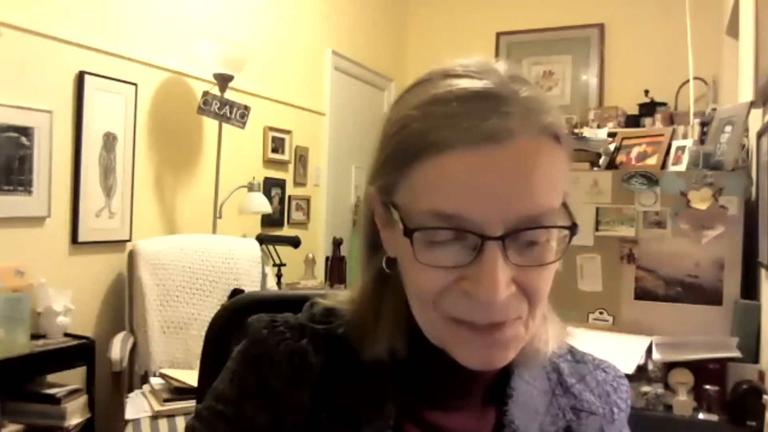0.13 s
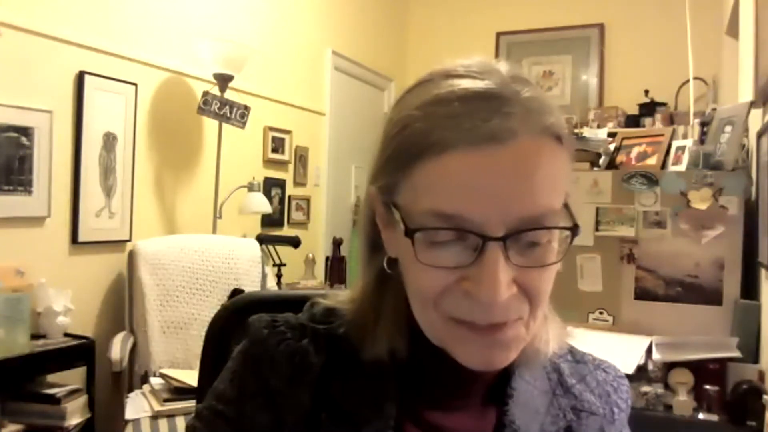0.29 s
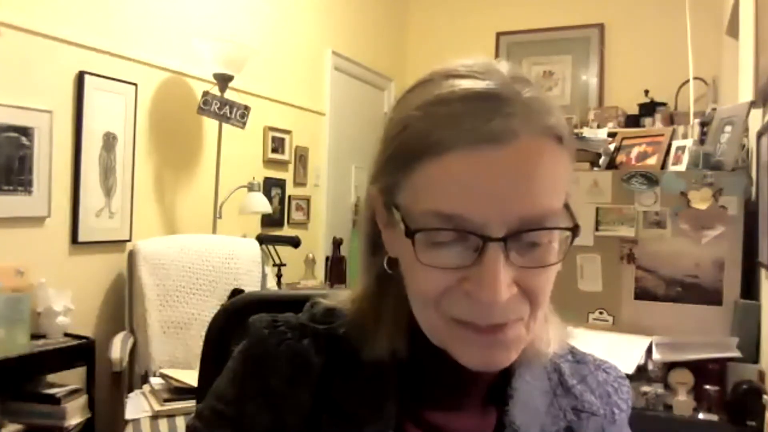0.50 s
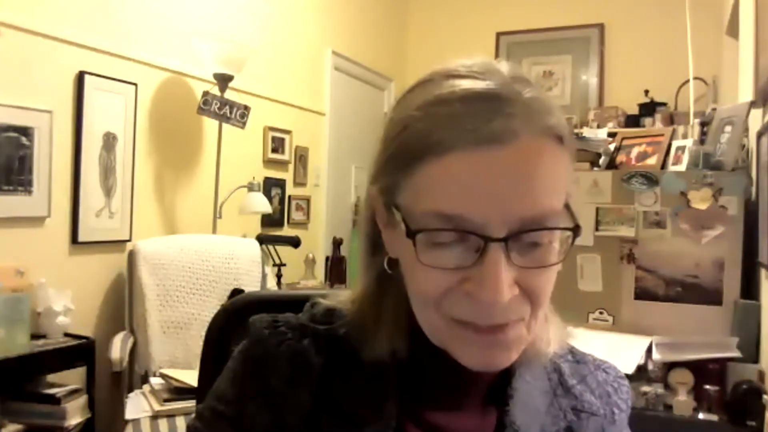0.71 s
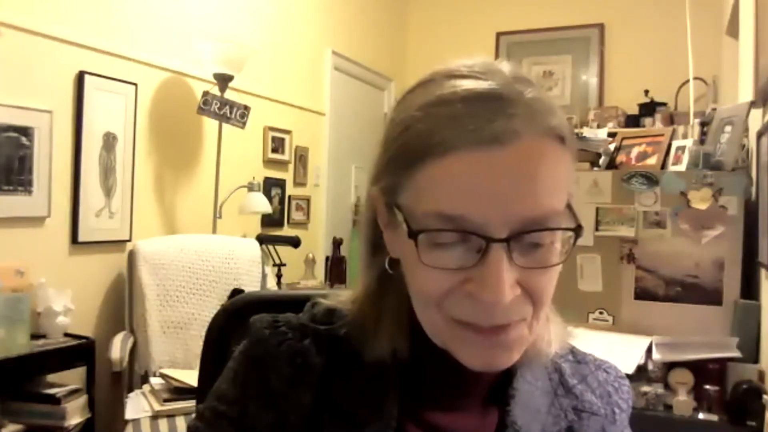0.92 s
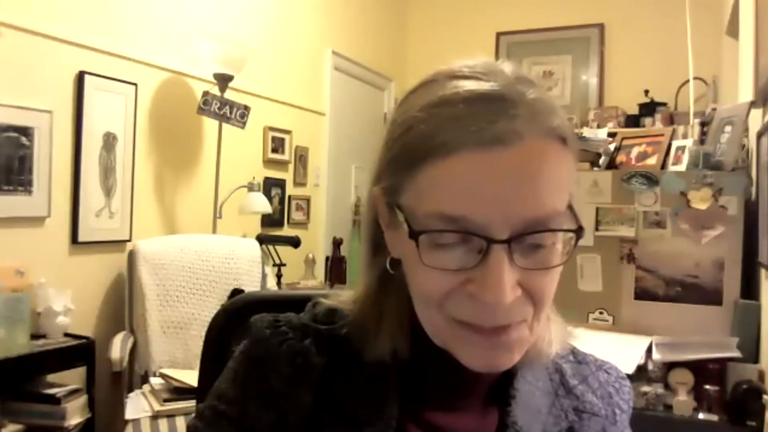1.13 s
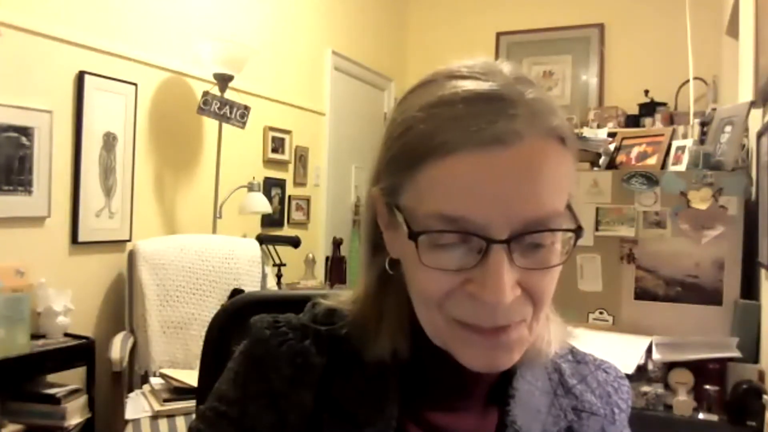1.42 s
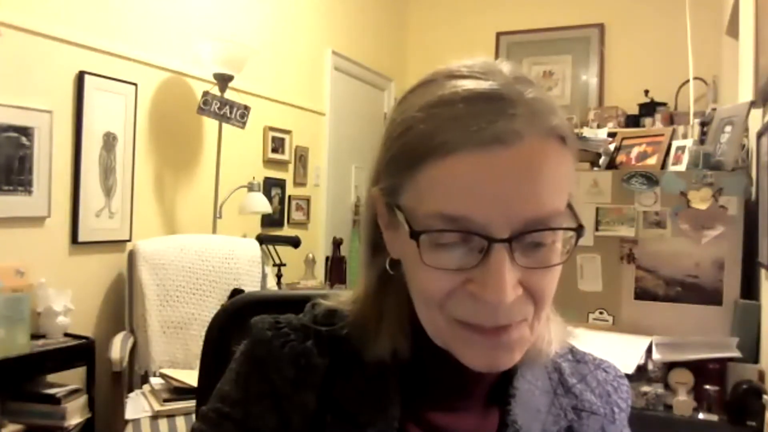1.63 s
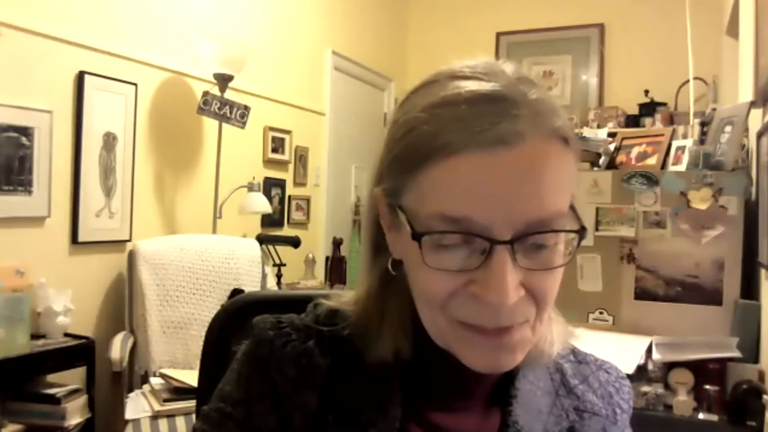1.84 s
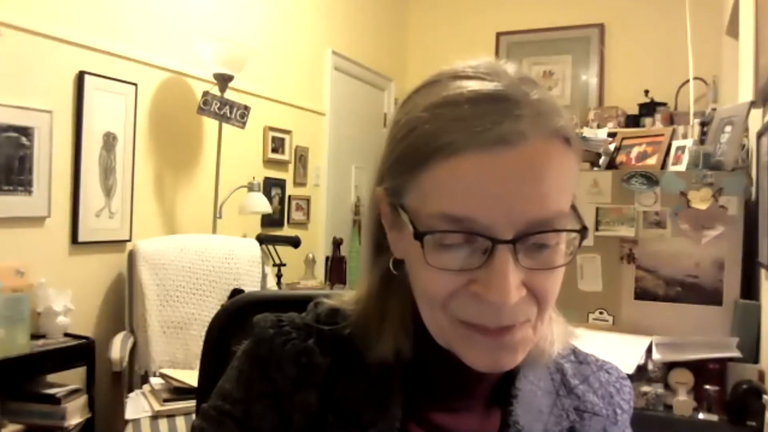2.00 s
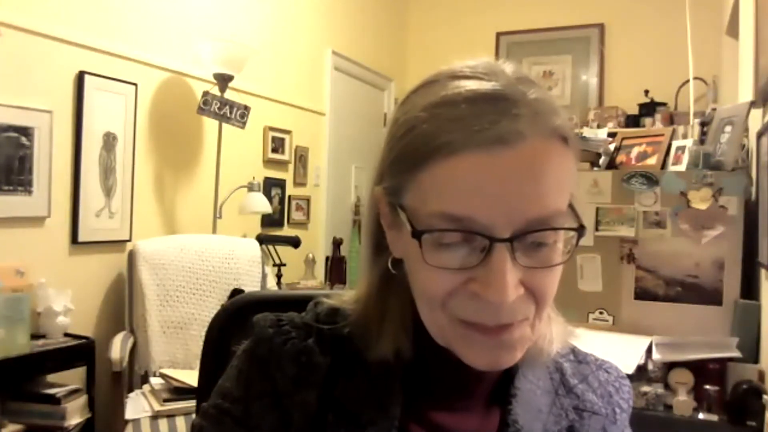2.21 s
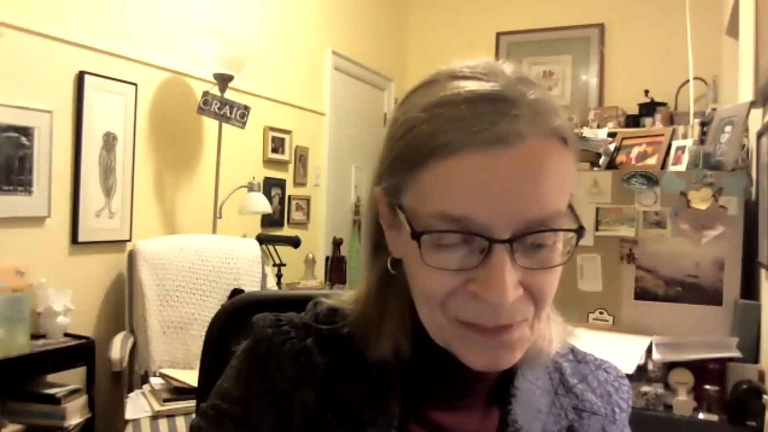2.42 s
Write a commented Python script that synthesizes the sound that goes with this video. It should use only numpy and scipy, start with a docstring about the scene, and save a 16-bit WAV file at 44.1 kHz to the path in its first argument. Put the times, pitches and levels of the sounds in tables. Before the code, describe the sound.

Close keyboard typing for about 2.4 seconds. A faint key release starts it, then quick plastic clacks from 0.24 to 0.53, the loudest sharp hit at 0.7, more at 0.9 to 1.23, double hits near 1.48 and 1.73, a fast cluster from 1.92 to 2.03, and a last press at 2.28. Small rattles, ticks and soft desk thuds fall between. Short room tail, faint rapid low throb, hum, hiss and thin whines.

```python
"""Quick typing in a quiet room

A plastic keyboard is heard close to a small computer microphone. Gritty noise through resonances makes
the sharp clack of each key hitting bottom, its loose rattle back up and small ticks; the case rings briefly.
Soft decaying tones are the desk's thuds. A machine throbs about 24 times a second as repeating pulses
with two hum tones, and shaped noise makes a faint hiss with two thin whines."""
import sys
import numpy as np
from scipy import signal
from scipy.fft import rfft, irfft, next_fast_len
from scipy.io import wavfile
from scipy.ndimage import uniform_filter1d, map_coordinates

SR = 44100
rng = np.random.default_rng(int(sys.argv[2]) if len(sys.argv) > 2 else 0)


def invert_db(level):
    """Linear amplitude ratio for a level in decibels (20 dB per decade), elementwise."""
    return 10 ** (np.asarray(level, dtype=float) / 20)


def transcribe(signal):
    """Save signal, clipped to [-1, 1], as a 16-bit WAV file at the path in sys.argv[1]."""
    frames = np.atleast_2d(signal).T
    limited = np.clip(frames, -1, 1)
    pcm = np.round(limited * 32767).astype(np.int16)
    wavfile.write(sys.argv[1], SR, pcm)


N = 112455  # length of the scene in samples
LEAD = SR // 25  # samples kept free ahead of each key sound's zero time
KEY_TIME = (np.arange(SR // 6) - LEAD) / SR  # seconds around one key event
THROB_HZ = 24.11


def unit(x):
    """Scaled to rms 1."""
    return x / np.sqrt(np.mean(x ** 2) + 1e-20)


def along(points, hz):
    """Reads between (Hz, value) points on a log frequency axis."""
    f, v = np.transpose(points)
    return np.interp(np.log(hz + 1), np.log(f + 1), v)


def wobble(rate):
    """A smooth random curve with rate knots a second."""
    knots = rng.standard_normal(int(N * rate / SR) + 4)
    return map_coordinates(knots, [np.arange(N) * rate / SR])


def filtered(x, response):
    """Multiplies the spectrum of x by a response of frequency."""
    m = next_fast_len(len(x) + 8192)
    return irfft(rfft(x, m) * response(np.fft.rfftfreq(m, 1 / SR)), m)[:len(x)]


def high_pass(f, hz, power):
    """Gain that falls below hz, more steeply with a higher power."""
    return 1 / (1 + (hz / (f + 1)) ** power)


def low_pass(f, hz, power):
    """Gain that falls above hz, more steeply with a higher power."""
    return 1 / (1 + (f / hz) ** power)


def resonance(f, hz, width_hz):
    """One causal resonance, gain 1 at its centre."""
    return 1j * f * width_hz / (hz * hz - f * f + 1j * f * width_hz)


def fade(t, t60):
    """Exponential decay from time 0, falling 60 dB in t60 seconds."""
    return (t >= 0) * invert_db(-60 * np.maximum(t, 0) / t60)


def once_a_cycle(s, width):
    """A bell-shaped pulse at delay s in every throb cycle, both in seconds."""
    cycles = ((np.arange(N) / SR - s) * THROB_HZ + .5) % 1 - .5
    return np.exp(-.5 * cycles ** 2 / (width * THROB_HZ) ** 2)


def keys():
    """Lays out every press, return and tick, each with its own room tail."""
    out = np.zeros(N + 2 * SR)
    for s, db, sound in presses() + returns() + ticks():
        wet = room(sound)
        out[round(s * SR) + LEAD:][:len(wet)] += invert_db(db) * wet
    return filtered(out[2 * LEAD:2 * LEAD + N], lambda f: high_pass(f, 448, 8))


# Keys hitting bottom. Each row: start in seconds, level in dB, key cap resonance in Hz,
# case knock trim in dB, treble trim in dB.
KEY_PRESSES = [(0.241, -13.5, 2150, -16, -11), (0.361, -11, 4400, -18.5, -13), (0.448, -20, 1670, -4, -12),
               (0.531, -13, 5100, -11, -12.5), (0.703, -3, 2940, -26.5, -11.5), (0.713, -19, 2360, -6, -11),
               (0.901, -11, 2790, -13, -11), (1.011, -27, 1910, -8, -12.5),
               (1.076, -14.5, 1700, -8.5, -13.5), (1.101, -33, 1970, 6.5, -11),
               (1.182, -21.5, 1870, -9.5, -12.5), (1.229, -14, 2010, -9.5, -3),
               (1.478, -14, 2060, -10.5, -4.5), (1.49, -17.5, 2090, -9, -3.5), (1.498, -24, 2000, -11, -5),
               (1.726, -11, 3690, -16.5, -12), (1.736, -24.5, 2300, -3, -11),
               (1.921, -13.5, 4320, -30, -12.5), (1.936, -18.5, 1530, -20, -17),
               (1.982, -17, 2700, -8.5, -2.5), (2.028, -16, 2130, -6, -16),
               (2.284, -14.5, 1930, -6.5, -3.5), (2.294, -36, 1930, 0, -22)]


def presses():
    """The stem scrapes, the key hits bottom with a clack, then a weaker sound settles."""
    slide_s, slide_db, rise_s, hold_s = 0.0062, -13, 0.0007, 0.0038
    clack_t60_s, settle_db, settle_t60_s = 0.023, -16, 0.13
    t = KEY_TIME
    scrape = invert_db(slide_db) * np.clip(1.08 + t / slide_s, 0, 1) * (t > -slide_s) * (t < 0)
    clack = fade(np.maximum(t - hold_s, 0), clack_t60_s)
    settle = invert_db(settle_db) * fade(t, settle_t60_s)
    shape = scrape + np.clip(t / rise_s, 0, 1) * (clack + settle)
    return [(s, db, contact(shape, hz, knock_db, treble_db, grit_db=3.5, loose=0.47))
            for s, db, hz, knock_db, treble_db in KEY_PRESSES]


# Keys springing back and rattling. Each row: start in seconds, level in dB, swell time in seconds,
# case knock trim in dB, treble trim in dB.
KEY_RETURNS = [(-.012, -16.5, 0.0045, -9.5, -6.5), (0.108, -27, 0.013, -5.5, -1),
               (0.316, -22.5, 0.004, -7.5, -10), (.659, -25, .01, -8, -0.5), (.813, -34, 0.0036, -13, -8.5),
               (1.329, -24, 0.011, -6.5, -2.5), (1.553, -23, 0.0073, -6, -2), (1.808, -40, .01, -16, -14),
               (2.077, -30.5, 0.0068, -38, -6), (2.406, -24, 0.0079, -5, -0.5)]


def returns():
    """A released key springs back: its rattle swells, then dies away."""
    start_db, t60_s = -8.5, 0.095
    t = KEY_TIME
    sounds = []
    for s, db, swell, knock_db, treble_db in KEY_RETURNS:
        rise = invert_db(start_db * np.clip(1 - t / swell, 0, 1)) * (t > 0)
        rattle = rise * fade(np.maximum(t - swell, 0), t60_s)
        sounds.append((s, db, contact(rattle, 2060, knock_db, treble_db, grit_db=0.0, loose=7.9)))
    return sounds


# Small ticks of stems and springs. Each row: start in seconds, level in dB, resonance in Hz.
STEM_TICKS = [(0.0914, -26.5, 1280), (0.2352, -19.5, 2290), (0.3118, -31, 2800), (0.4382, -31, 1640),
              (0.4659, -26.5, 2620), (0.4764, -29.5, 2760), (0.5629, -30.5, 1140), (0.6454, -25, 1648),
              (0.8021, -29.5, 1330), (0.97, -33, 1250), (0.9919, -26, 2600), (1.1626, -29, 1710),
              (1.202, -43, 2100), (1.2762, -30.5, 1100), (1.3138, -30, 2400), (1.5419, -23, 1680),
              (1.8017, -30.5, 1662), (1.951, -28, 1270), (2.0166, -24, 2260), (2.0465, -34, 2230),
              (2.0662, -27.5, 2210), (2.319, -27, 1142), (2.393, -25.5, 1390)]


def ticks():
    """Stems and springs tick: a very short burst of dull noise with a longer tail."""
    rise_s, t60_s, tail_db, tail_t60_s = 0.0011, 0.0071, -2, 0.072
    t = KEY_TIME
    shape = np.clip(t / rise_s, 0, 1) * (fade(t, t60_s) + invert_db(tail_db) * fade(t, tail_t60_s))
    return [(s, db, contact(shape, hz, knock_db=-22, treble_db=-24, grit_db=2, loose=1))
            for s, db, hz in STEM_TICKS]


# Ringing tones of the case. Each row: central pitch in Hz, central level in dB,
# time to fall 60 dB in seconds.
CASE_MODES = [(547, -8.5, 0.12), (689, -3, 0.079), (799, 7.5, 0.024), (880, 6.5, 0.028),
              (1112, -3.5, 0.065), (1277, -15.5, 0.015)]
# Tone of the plastic before the treble trims. Each row: frequency in Hz, relative level in dB.
PLASTIC_TONE = [(180, -58), (300, -29), (1090, 2), (1600, -4), (3210, -3), (3860, -5), (5690, -5.5),
                (7070, -19.5), (8130, -21.5), (12200, -31.5), (15800, -72), (22000, -120)]


def contact(shape, cap_hz, knock_db, treble_db, grit_db, loose):
    """Gritty noise under a shape drives the key cap; the blow and loose noise ring the case."""
    lumps_db, treble_from_hz, air_from_hz = 3, 4050, 6500
    cap_q, cap_ring_db, cap_ring_s = 5, 11, .012
    n = len(shape)
    since_blow = np.arange(n) - shape.argmax()  # samples after the loudest point
    # the tail rattles unevenly
    late = np.clip(since_blow / (.01 * SR), 0, 1)
    lumps = lumps_db * late * unit(uniform_filter1d(rng.standard_normal(n), size=250))
    grit = grit_db * unit(uniform_filter1d(rng.standard_normal(n), size=60))
    push = shape * invert_db(grit + lumps) * rng.standard_normal(n)
    # the cap rings most at the blow
    early = np.exp(-np.maximum(since_blow, 0) / (cap_ring_s * SR))
    cap = filtered(push * early, lambda f: resonance(f, cap_hz, cap_hz / cap_q))
    push = push + invert_db(cap_ring_db) * cap
    # dull keys are duller still on top, with some scatter
    air_db = 0.26 * (treble_db + 15) + 3 * rng.standard_normal()

    def tone(f):
        treble = (treble_db + 9) * high_pass(f, treble_from_hz, 6)
        air = air_db * high_pass(f, air_from_hz, 6)
        return invert_db(along(PLASTIC_TONE, f) + treble + air)

    t = np.arange(n // 2) / SR
    ring = np.zeros(n // 2)
    for hz, db, t60 in CASE_MODES:
        level = invert_db(db + rng.normal(0, 3))
        ring += level * fade(t, t60) * np.sin(2 * np.pi * hz * rng.normal(1, .015) * t)
    blow = unit(since_blow == 0) + loose * unit(shape ** 2 * rng.standard_normal(n))
    knock = signal.fftconvolve(blow, ring)[:n]
    both = unit(filtered(push, tone)) + invert_db(knock_db + 4.5) * unit(knock)
    return invert_db(-10.5) / unit(shape).max() * both


# How long the room rings. Each row: frequency in Hz, time to fall 60 dB in seconds.
ROOM_DECAY = [(400, 0.46), (1500, 0.24), (4000, 0.27), (10000, 0.33)]


def room(x):
    """Adds a short noise tail, each frequency dying at its own speed."""
    tail_db, delay = -16.5, 250  # delay in samples
    hz, t, z = signal.stft(rng.standard_normal(SR // 3), SR, nperseg=256)
    decay = invert_db(-60 * t / along(ROOM_DECAY, hz)[:, None])
    tail = signal.istft(z * decay, SR, nperseg=256)[1]
    wet = signal.fftconvolve(np.pad(x, (delay, 0)), tail / np.linalg.norm(tail))
    return np.pad(x, (0, len(wet) - len(x))) + invert_db(tail_db) * wet


# Low thuds of the desk under the hands. Each row: start in seconds, level in dB, pitch in Hz.
DESK_THUDS = [(.243, -37, 215), (.25, -43, 115), (.385, -44, 72), (.55, -43, 150), (.706, -38, 475),
              (.708, -37, 572), (1.48, -42, 122), (1.485, -41, 195), (1.727, -40, 565), (2.285, -46, 150),
              (2.41, -45, 110)]


def desk():
    """The desk sounds soft low tones that rise quickly and die away."""
    rise_s, t60_s = .008, .18
    out = np.zeros(N)
    for s, db, hz in DESK_THUDS:
        t = np.arange(N) / SR - s
        out += invert_db(db) * fade(t, t60_s) * np.clip(t / rise_s, 0, 1) * np.sin(2 * np.pi * hz * t)
    return out


# One throb cycle: a small dip, a push, a pull, a slow swell. Each row: delay in seconds,
# size before the level wavers, width in seconds.
THROB_PULSES = [(.0105, -.005, .0005), (.0140, .0165, .00055), (.0229, -.018, .00055), (.0302, .0045, .003)]
# Hum tones. Each row: pitch in Hz, rms level in dB before wavering, waver in dB.
HUM_TONES = [(114.2, -59.5, 1), (395.6, -67.5, 2)]


def machine():
    """Pulses repeat each cycle, smoothed and wavering in level, with two hum tones."""
    t = np.arange(N) / SR
    throb = sum(size * once_a_cycle(s, width) for s, size, width in THROB_PULSES)
    wavering = (throb - throb.mean()) * invert_db(0.77 * wobble(11.75))
    out = filtered(wavering, lambda f: low_pass(f, 560, 12))
    for hz, db, waver_db in HUM_TONES:
        level = invert_db(db + waver_db * wobble(5.54))
        out += np.sqrt(2) * level * np.sin(2 * np.pi * hz * t)
    return out


# Colour of the hiss. Each row: frequency in Hz, relative level in dB.
HISS_TONE = [(30, -11.5), (130, -1), (270, -4), (480, -10), (620, -17.5), (900, -30), (1330, -25.5),
             (2560, -30), (3300, -30.5), (5300, -35.5), (6650, -37), (12200, -48)]
# Thin whines. Each row: pitch in Hz, width in Hz of each of two equal resonances in a row,
# rms level in dB before wavering and dips.
WHINES = [(2740, 43, -67.5), (5250, 230, -72)]


def hiss():
    """Noise with a lumpy low end, plus two narrow noise whines that dip in each throb cycle."""
    level_db = -52.5
    shaped = filtered(rng.standard_normal(N), lambda f: invert_db(along(HISS_TONE, f)))
    noise = invert_db(level_db) * unit(shaped)
    low = filtered(noise, lambda f: low_pass(f, 600, 6))
    floor = noise + (invert_db(2.8 * wobble(29.98)) - 1) * low
    whine = np.zeros(N)
    for hz, width_hz, db in WHINES:
        narrow = filtered(rng.standard_normal(N), lambda f: resonance(f, hz, width_hz) ** 2)
        whine += invert_db(db) * unit(narrow)
    dip_s, dip_width_s, dip_db = .0145, .004, -7
    return floor + whine * invert_db(1.4 * wobble(8.75) + dip_db * once_a_cycle(dip_s, dip_width_s))


def scene():
    """Keys and desk over machine and hiss."""
    return (keys() + desk() + machine() + hiss())[None]


def band_limit(x):
    """A steep low-pass at the top of the band."""
    return signal.sosfilt(signal.butter(12, 12310, fs=SR, output="sos"), x)


def record(dry):
    """The microphone cuts deep bass and rolls off toward its upper band limit."""
    bass_cut_hz, roll_off_hz, top_hz = 39.6, 11360, 12300

    def mic(f):
        return (f < top_hz) * low_pass(f, roll_off_hz, 24) * high_pass(f, bass_cut_hz, 7)

    mix = filtered(dry[0], mic)[None]
    return band_limit(mix)


dry = scene()
out = record(dry)
transcribe(out)
```